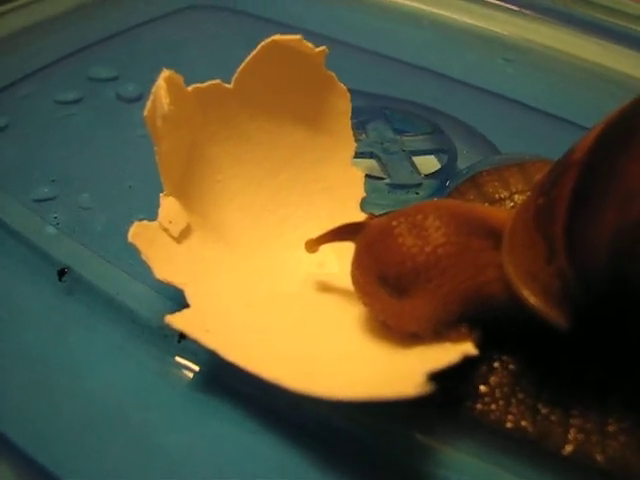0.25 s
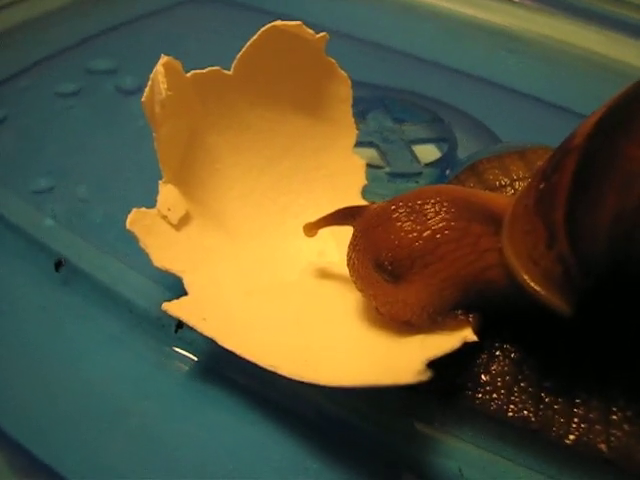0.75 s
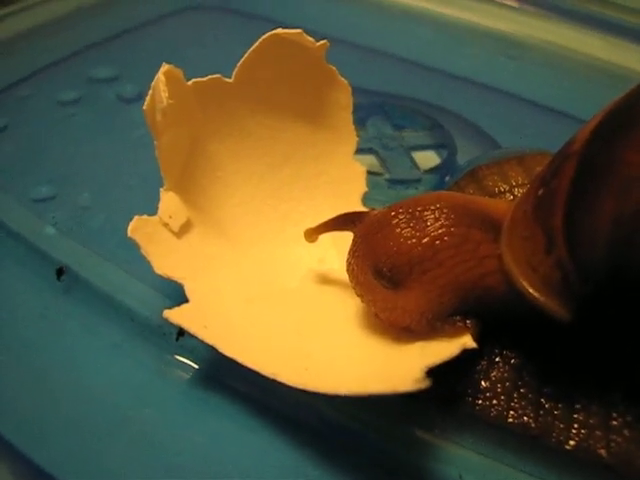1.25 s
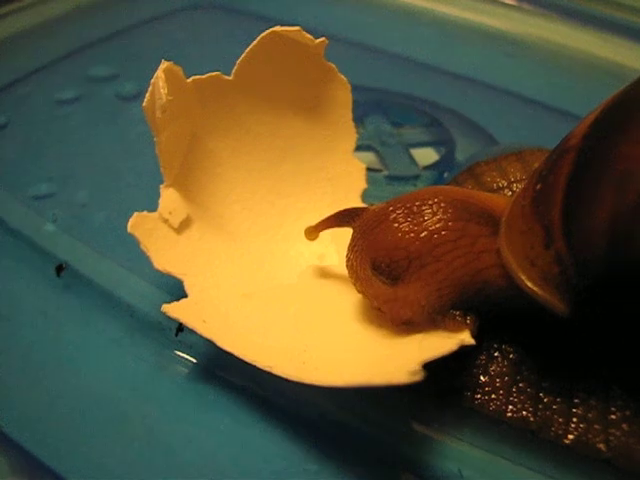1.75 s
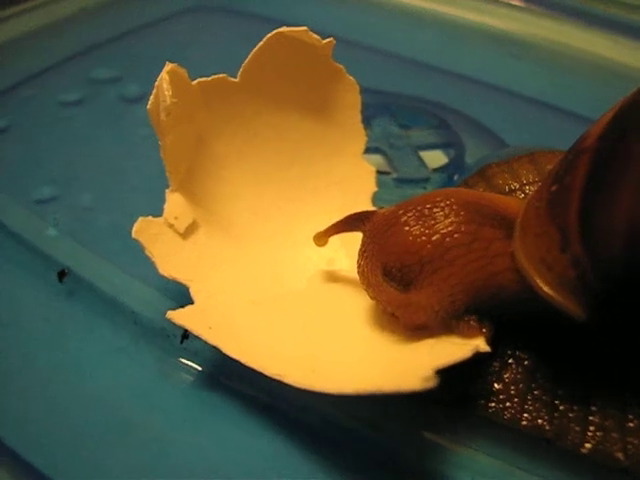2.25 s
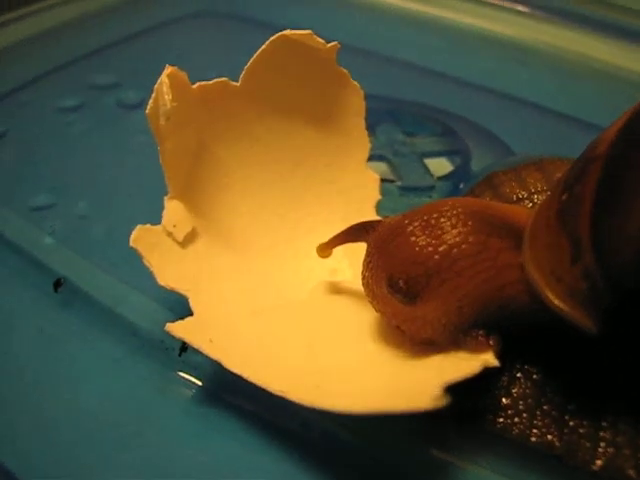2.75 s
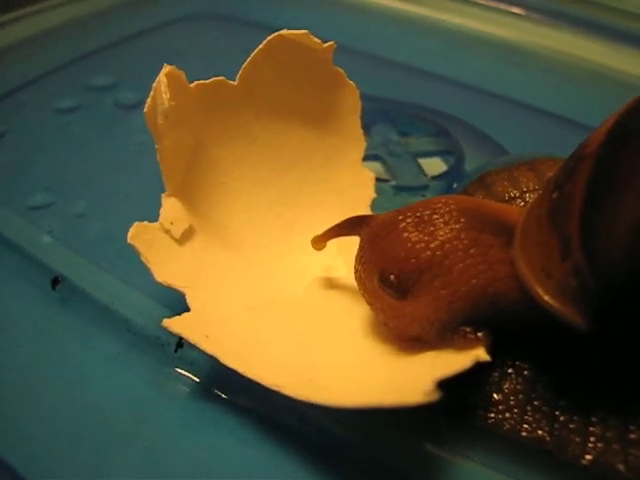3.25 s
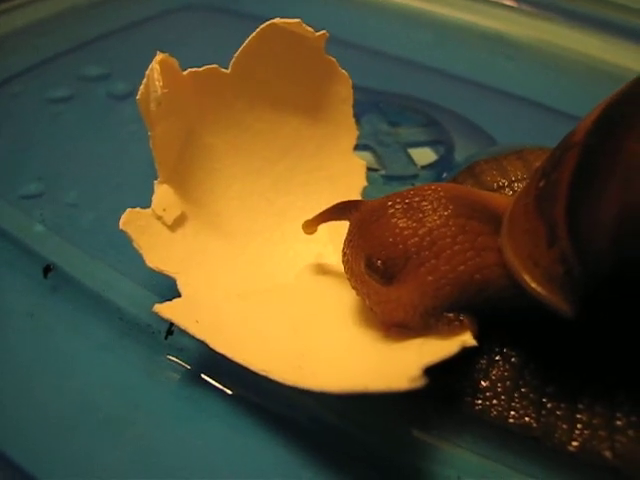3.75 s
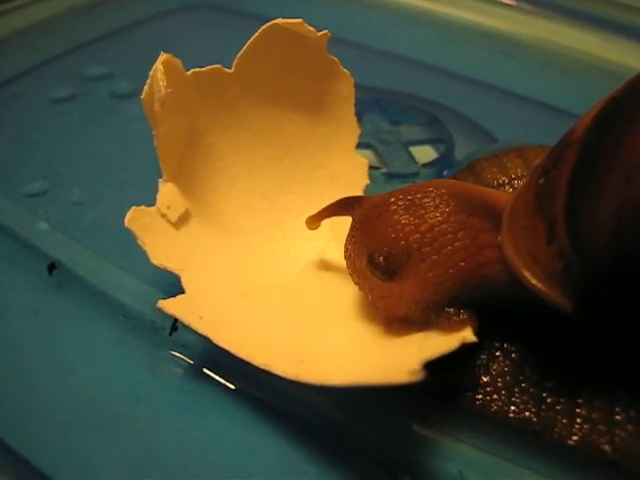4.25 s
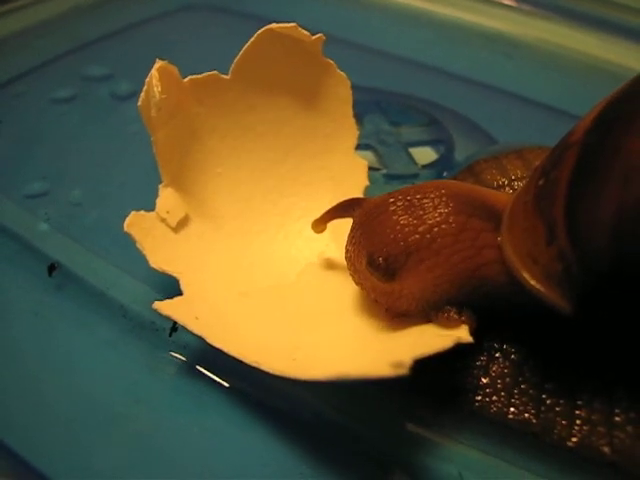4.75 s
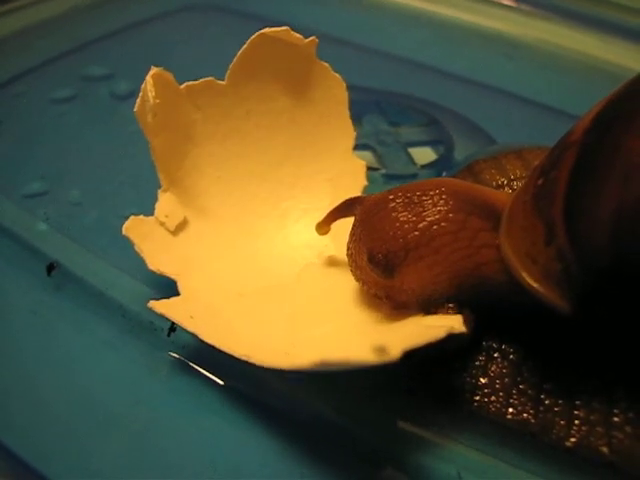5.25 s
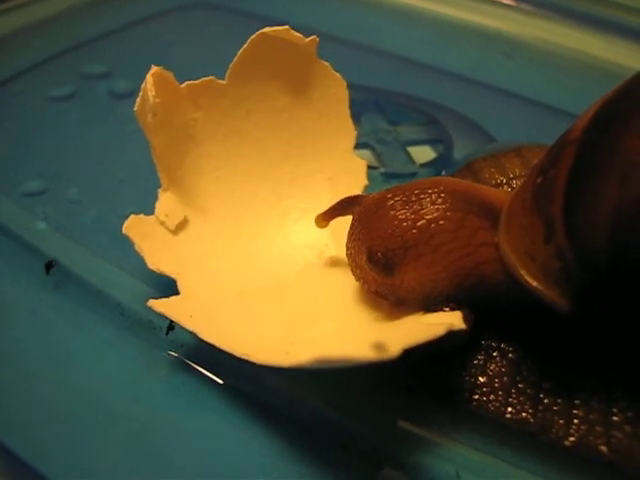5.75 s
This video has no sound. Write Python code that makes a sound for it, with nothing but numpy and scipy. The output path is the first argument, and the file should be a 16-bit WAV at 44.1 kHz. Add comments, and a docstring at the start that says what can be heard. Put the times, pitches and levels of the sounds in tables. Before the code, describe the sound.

A snail rasps at eggshell in a tub, brittle snaps and gritty crackles in uneven clusters over low hum, hiss and a faint high whine.

```python
"""A low room hum, an even hiss and a thin electronic whine from a small, very near camera run throughout.
A large snail rasps at eggshell in a plastic tub: rows of tiny teeth make a fine gritty scrape.
Clusters of snapping chips and smaller crumbs ring the shell's resonances; the tub and room echo them.
The camera's housing ticks and creaks in the hand, and moving fingers add soft, low bumps.
Its gain control turns the sound down after the loudest snaps, then slowly lets it recover."""
import sys
import numpy as np
from scipy import signal
from scipy.fft import rfft, irfft
from scipy.io import wavfile
from scipy.ndimage import uniform_filter1d

SR = 44100
rng = np.random.default_rng(int(sys.argv[2]) if len(sys.argv) > 2 else 0)


def dump_mix(stems):
    """Bounce the given channels to the path in sys.argv[1] as a 16-bit WAV at rate SR."""
    frames = np.atleast_2d(stems).T  # one column per channel
    limited = np.clip(frames, -1, 1)  # hard clip at full scale
    pcm = np.round(limited * 32767).astype(np.int16)
    wavfile.write(sys.argv[1], SR, pcm)


N = 264600

# spectrum of the room and microphone background: f/Hz, relative level per Hz/dB
BACKGROUND_SPECTRUM = [(25, -10.5), (55, -9), (75, -7.5), (92, 3.5), (130, -5), (300, -1), (520, -7),
                       (800, -4.5), (1300, -7.5), (3000, -8.5), (7000, -12), (8500, -10.5), (11000, -17),
                       (15500, -20)]
# hollow hum of the microphone ports: f/Hz, width/Hz, relative level left/dB, right/dB
PORT_HUM = [(401.5, 41, 10, 2.5), (598, 86, -0.5, -5), (975, 83, -4, -2)]
# slow changes of the low background: t/s, relative level/dB
HUM_SWELL = [(0, 4), (1.4, 3), (2, .5), (3.5, 1.1), (4.5, -1), (6, 0.5)]
# how alike the two background channels are: f/Hz, correlation/1
CHANNEL_LIKENESS = [(30, 1), (120, 0.56), (400, 0.6), (1000, 0.43), (3000, 0.18), (15000, 0.048)]
# electronic whine, before its flips: f/Hz of each tone
WHINE_PITCHES = (7867, 8264)
# strength of each whine tone: level left/dB, right/dB
WHINE_LEVELS = [(-51, -49), (-78, -55.5)]
# strokes of the toothed tongue: start t/s, length/s, level at the height/dB
TONGUE_STROKES = [(0.843, 0.4, -60.5), (1.149, .25, -50), (1.357, 0.26, -52), (1.619, 0.62, -63.5),
                  (3.8, 0.23, -56.5), (4.021, .16, -46), (4.188, 0.19, -53.5), (4.561, 0.28, -52),
                  (5.34, .07, -56.5)]
# usual resonances of the eggshell: f/Hz, width/Hz, relative level left/dB, right/dB
SHELL_MODES = [(2050, 304, -16, -19), (2790, 220, -17, -9), (3353, 365, -15.5, -9.5),
               (3820, 320, -12.5, -12.5), (4850, 315, -8, -4.5), (5260, 600, -6, -6), (6210, 584, 3, 6),
               (7290, 510, 1, -0.5), (8600, 1060, -18, -15.5), (9970, 1530, -21, -19),
               (13410, 1400, -28, -35)]
# how the snail's hold bends and damps the shell: t/s, usual bending f/Hz,
# relative bending level/dB, gain of the middle modes/dB
SNAIL_HOLD = [(1.45, 1660, -17, -4.5), (3.9, 1772, -12.5, 5), (4.4, 2030, -26, -1), (4.85, 2140, -38, -3),
              (5.1, 1715, -19, -2), (5.5, 1670, -18.5, -5.5)]
# chips that snap off: t/s, level/dB, relative weight of the low modes/dB, crumbling time/ms
SHELL_SNAPS = [(.0535, -39, -7, .4), (.1505, -39, 2, 4), (0.1635, -28.5, 6, 3.4), (1.1733, -34, -6, .2),
               (1.185, -20.5, -11, 0.14), (1.2293, -28.5, -19, 2.9), (1.2553, -34, -7, 7),
               (1.263, -24, -13, 0.4), (1.2948, -20.5, -11.5, 2), (1.3404, -17, -9, 1.31),
               (1.375, -28, -5, 1), (1.3983, -25.5, 3, 2.9), (1.4207, -26.5, -2, 0.76),
               (1.4269, -21.5, -12, 0.15), (1.4588, -22, -5, 1.57), (1.4654, -25, -6, 0.52),
               (1.4958, -24, -7, 1.2), (1.534, -27.5, -1.5, 2.8), (1.5603, -12, -5, 2.63),
               (1.563, -12.5, -3.5, 1.2), (1.5787, -19, -13, 0.73), (2.054, -28, -17, 0.62),
               (2.062, -28, -7, 1.9), (3.847, -34.5, -15, .3), (3.8766, -37, -7, 0.98),
               (3.9334, -32.5, -19, 0.22), (3.949, -29.5, -6, 1.9), (3.9581, -31, -3, 0.54),
               (3.9948, -24.5, -13, 2.45), (4.028, -23.5, -5, 0.84), (4.0559, -26, -9, 6.8),
               (4.0681, -21.5, -7, .2), (4.075, -16.5, -12, 0.25), (4.0826, -25, -14, 1.8),
               (4.1394, -27.5, -21, 2.9), (4.1549, -8.5, -13, 0.23), (4.1734, -25, -24, 0.27),
               (4.1898, -11.5, -14.5, 0.11), (4.2303, -14.5, -7.5, 0.16), (4.258, -10, -14, 0.31),
               (4.2707, -25, -16, 1.1), (4.2873, -17, -18, 0.97), (4.2921, -16.5, -18, 1.1),
               (4.296, -16, -14, .3), (4.3063, -27, -6, .3), (4.3163, -16, -4, 1.7),
               (4.3223, -10, -6.5, 0.72), (4.334, -29, -12, 1.2), (4.382, -11, -2, 0.18),
               (4.3952, -20.5, -4, 4.8), (4.4011, -15.5, -7, 0.17), (4.4447, -24.5, -21, 0.7),
               (4.519, -32, -8, 0.65), (4.5632, -26.5, -11, 0.95), (4.616, -18, -16, .2),
               (4.6452, -5.5, -11.5, 0.62), (4.701, -16, -5.5, 0.25), (4.708, -3.5, -12, 0.62),
               (4.76, -10.5, -1, 1.47), (4.7737, -2.5, -12, 0.28), (4.7854, -10.5, 0, .8),
               (4.81, -1, -13.5, 0.15), (4.87, -11, -9, 1.04), (5.017, -33.5, -17, 0.57),
               (5.1064, -3, -18.5, 0.21), (5.1105, -8, -7, 0.14), (5.221, -31.5, -1, 0.33),
               (5.4568, -4, -10, 0.52), (5.4818, -8, -13.5, 0.46), (5.5172, -2, -6, 3.02)]
# ring centre aimed at by a 0 dB chip, as the mouth works along the edge: t/s, f/Hz
FULL_CHIP_CENTRE = [(1.3, 6140), (4.28, 6380), (4.39, 6060), (5.5, 6110)]
# hollow notes of the plastic tub: f/Hz, width/Hz, relative level/dB
TUB_NOTES = [(255.6, 23, 7), (430, 52, -1), (804, 44, 6.5), (1407, 44, -6.5)]
# ticks of the housing in the hand: t/s, relative level/dB
HOUSING_TICKS = [(.166, -44.5), (.289, -42), (.78, -40), (.974, -37), (1.342, -42.5), (1.566, -40.5),
                 (1.6195, -37.5), (1.642, -34.5), (1.688, -29.5), (1.7287, -25.5), (2.646, -44),
                 (3.2057, -39), (3.2226, -42), (3.2524, -39), (3.3645, -34), (3.682, -29), (3.6965, -29),
                 (3.7247, -27)]
# resonances of the housing: f/Hz, width/Hz, relative level at the left port/dB, right port/dB
HOUSING_MODES = [(145, 96, -27, -9), (377.5, 35, -1, -8), (604, 54, -2.5, -2.5), (987, 88, -8.5, 0.5),
                 (1048, 61, -25, 3), (1370, 200, -22.5, -11), (3240, 890, -43, -12), (6100, 1900, -45, -20)]
# creaks of the housing: start t/s, length/s, relative level of a slip/dB
HOUSING_CREAKS = [(0.739, .15, -50), (1.585, .1, -41), (3.145, .05, -45.5)]
# soft bumps of the hand: t/s, level/dB, centre f/Hz
HAND_BUMPS = [(1.998, -46, 130), (2.219, -56, 190), (2.289, -49, 250), (2.85, -48.5, 211),
              (2.908, -48, 173), (3.379, -50.5, 130)]

TAPS = 2048  # length of a short response, in samples
BINS = np.fft.rfftfreq(TAPS, 1 / SR)  # Hz
TIME = np.arange(N) / SR  # s
FRAME_HZ = 29.97  # picture frames per second
EDGE_HZ = 16100  # upper band limit

STROKE_PEAK, STROKE_SHAPE = 0.32, 0.99  # share spent pressing harder; lower shape = flatter top
IDLE_DB = -74.5  # the mouth never quite rests
MIDDLE_HZ, MIDDLE_WIDTH_HZ = 5300, 260  # shell modes changed by the snail's hold
# weaker chips aim for a higher ring, and no two are quite alike
RISE_HZ_PER_DB, CHIP_SPREAD_HZ = 11.5, 50
# first give before a chip goes: average lead, level below the snap, highest level
GIVE_MS, GIVE_UNDER_DB, GIVE_TOP_DB = 1.8, -15.5, -29.5
HARD_TICK_DB, HARD_CRISP_DB, CRISP_PER_DB = -26, -2.5, 0.8  # harder ticks have crisper treble
SLIP_GAP_S, SLIP_JITTER = .02, 0.263  # jitter is a share of the gap
# crumbs: rate, level above the stroke's pressure and its spread
CRUMBS_PER_S, CRUMB_OVER_DB, CRUMB_SPREAD_DB = 33, 17.5, 2
# weight of their low modes and its spread; average crumbling time
CRUMB_LOW_DB, CRUMB_LOW_SPREAD_DB, CRUMB_MS = -6, 5.5, 1.2


def amp(db):
    """Turns decibels into gain."""
    return 10 ** (np.asarray(db) / 20)


def evened(x):
    """Scales a sound to an rms level of one."""
    return x / np.sqrt(np.mean(x ** 2) + 1e-20)


def read(points, hz):
    """Reads a spectrum between its points, along a log-frequency axis."""
    f, value = np.transpose(points)
    return np.interp(np.log(hz + 1), np.log(f + 1), value)


def add(mix, s, sound):
    """Mixes a sound in at time s, cutting off anything past the end."""
    part = mix[:, max(round(s * SR), 0):][:, :sound.shape[1]]
    part += sound[:, :part.shape[1]]


def sides(modes):
    """Splits two-sided resonances into a left set and a right set."""
    modes = np.array(modes)
    return modes[:, [0, 1, 2]], modes[:, [0, 1, 3]]


def peaks(modes, hz, steep):
    """Gives the gain of resonances with summed power; steep sets how fast their skirts fall."""
    power = 0
    for f, width, db in modes:
        distance = (2 * (hz - f) / width) ** 2
        power = power + amp(db) ** 2 / (1 + distance / steep) ** steep
    return np.sqrt(power)


def causal(gain):
    """Gives a gain curve the phase of a sound that starts sharply and then rings out."""
    log_gain = np.log(np.maximum(gain, 1e-5))
    mirrored = np.r_[log_gain, log_gain[-2:0:-1]]
    return np.exp(np.conj(signal.hilbert(mirrored)))[:len(gain)]


def per_ms(x):
    """Scales a click to the energy of one millisecond at full level."""
    energy = (x ** 2).sum(-1).mean()
    return x / np.sqrt(energy * 1000 / SR)


def background(level_db=-48.0):
    """Shapes noise into a slowly changing low hum, coloured by the microphone ports, and an even hiss."""
    hz = np.fft.rfftfreq(N, 1 / SR)
    left, other = rfft(rng.standard_normal((2, N)))
    same = read(CHANNEL_LIKENESS, hz)
    right = same * left + np.sqrt(1 - same ** 2) * other
    ports = np.array([peaks(side, hz, steep=1.9) for side in sides(PORT_HUM)])
    colour = np.hypot(amp(read(BACKGROUND_SPECTRUM, hz)), ports) * (hz < 15900)
    noise = np.array([left, right]) * colour
    low = 1 / (1 + (hz / 1500) ** 2)
    hum = irfft(noise * low, N) * amp(np.interp(TIME, *np.transpose(HUM_SWELL)))
    hiss = irfft(noise * (1 - low), N)
    return amp(level_db) * evened(hum + hiss)


def whine(right_late=0.7):
    """Flips thin electronic tones over with every picture frame, which makes them flutter."""
    flip = (-1) ** np.floor(TIME * FRAME_HZ)
    lag = np.array([[0], [right_late]])  # radians
    tones = np.zeros((2, N))
    for hz, db in zip(WHINE_PITCHES, WHINE_LEVELS):
        tones += amp(db)[:, None] * np.sqrt(2) * np.sin(2 * np.pi * hz * TIME - lag)
    return flip * tones


def pressure():
    """Makes the force of the scrape swell and let go in the same arch for every stroke."""
    gain = np.full(N, amp(IDLE_DB))
    for start, length, db in TONGUE_STROKES:
        rise = np.interp((TIME - start) / length, [0, STROKE_PEAK, 1], [0, 1, 0])
        gain = np.maximum(gain, amp(db) * np.sin(np.pi / 2 * rise) ** STROKE_SHAPE)
    return gain


def shell_ring(centre_hz, low_db, crumble_ms, s, usual_hz=6350, usual_low_db=-13, lean_db=9,
               thud_db=-36, bend_width_hz=480, bounce=0.37, bounce_ms=0.842, follow=0.74,
               right_late_ms=0.013):
    """Rings the shell as held at time s with a crack, its followers and an echo from the tub floor."""
    lean = (centre_hz - usual_hz) / usual_hz
    times, *columns = np.transpose(SNAIL_HOLD)
    bend_hz, bend_db, middle_db = (np.interp(s, times, column) for column in columns)
    bend = (bend_hz, bend_width_hz, bend_db, bend_db)
    modes = np.array([bend] + list(SHELL_MODES), float)
    # the modes follow only part of the shift in centre, and each varies a little
    modes[:, 0] *= 1 + .35 * lean + .016 * rng.standard_normal(len(modes))
    modes[:, 2:] += 1.6 * rng.standard_normal((len(modes), 2))

    # small chips favour the high modes, deep cracks the low ones
    colour_db = lean_db * lean * 10 * np.clip(np.log2((BINS + 1) / usual_hz), -.4, .4)
    low_lift_db = (low_db - usual_low_db + 30 * lean) * 0.85
    colour_db = colour_db + low_lift_db / (1 + (BINS / 4200) ** 10)
    colour_db = colour_db + middle_db * np.exp(-((BINS - MIDDLE_HZ) / MIDDLE_WIDTH_HZ) ** 2)
    thud = amp(thud_db) * (BINS / (BINS + 400)) ** 2
    gains = [(peaks(side, BINS, steep=2.27) + thud) * amp(colour_db) for side in sides(modes)]
    ring = np.array([causal(gain) for gain in gains])

    turn = -2j * np.pi * BINS / 1000  # phase turn per ms of delay
    # the crack runs on in a few uneven steps
    order = np.arange(1, 5)
    delays = crumble_ms * (order - rng.uniform(0, 0.62, len(order))) / len(order)
    signs = rng.choice([-1, 1], len(order))
    sizes = follow * np.tanh(crumble_ms ** 2) * signs / order ** 0.16
    crack = 1 + sizes @ np.exp(np.outer(delays, turn))
    echo_ms = bounce_ms * (rng.uniform(0.806, 1.163) + rng.uniform(0, 0.059, (2, 1)))
    floor_echo = 1 + bounce * np.exp(turn * echo_ms)
    arrival = np.exp(turn * [[0], [right_late_ms]])
    return per_ms(irfft(ring * crack * floor_echo * arrival))


def grit(per_s=650, spread_db=4, low_db=-10, fizz=1.4, count=10):
    """Catches tiny teeth on the shell at random, each a faint ring with a dry fizz on top."""
    out = np.zeros((2, N))
    for _ in range(count):
        hits = rng.random(N) < per_s / count / SR
        catches = hits * amp(spread_db * np.minimum(rng.exponential(1, N), 3))
        # each group rings as the shell is held at some random moment
        ring = shell_ring(rng.uniform(5600, 7300), low_db, 0, rng.choice(TIME))
        out += signal.oaconvolve(catches[None], ring, axes=1)[:, :N]
    fizz_band = signal.butter(3, [8200, 11500], "band", fs=SR, output="sos")
    out += fizz * signal.sosfilt(fizz_band, out)
    return evened(out) * pressure()


def chip(s, db, low_db, crumble_ms):
    """Breaks one piece off; the louder it is, the lower the shell tends to ring."""
    full_hz = np.interp(s, *np.transpose(FULL_CHIP_CENTRE))
    centre_hz = full_hz - RISE_HZ_PER_DB * db + CHIP_SPREAD_HZ * rng.standard_normal()
    return amp(db) * shell_ring(centre_hz, low_db, crumble_ms, s)


def snaps():
    """Breaks chips off the edge of the shell, each after a slight first give."""
    out = np.zeros((2, N))
    for s, db, low_db, crumble_ms in SHELL_SNAPS:
        add(out, s, chip(s, db, low_db, crumble_ms))
        early_s = GIVE_MS * rng.uniform(.5, 1.5) / 1000
        give_db = min(db + GIVE_UNDER_DB, GIVE_TOP_DB)
        add(out, s - early_s, chip(s, give_db, low_db, GIVE_MS))
    return out


def tub(x, scatter_db=-20.5, scatter_t60=.014, hollow_db=6):
    """Scatters each click off the tub walls for a few milliseconds while its hollow notes ring on."""
    t = np.arange(TAPS) / SR
    scatter = rng.standard_normal((2, TAPS)) * amp(-60 * t / scatter_t60) * (t > .0012)
    scatter = amp(scatter_db) * scatter / np.linalg.norm(scatter[0])
    hollow = amp(hollow_db) * irfft(causal(peaks(TUB_NOTES, BINS, steep=1.34)))
    return signal.oaconvolve(x, scatter + hollow, axes=1)[:, :N]


def room_tail(t60=0.26, treble_t60=.1, wall_s=0.013, wall_db=5, treble=.3):
    """Scatters fading echoes of a small room, strengthened when the nearest walls answer."""
    t = np.arange(SR // 2) / SR
    taps = rng.standard_normal((2, len(t))) * (rng.random((2, len(t))) < .3)
    taps = (taps + 0.17 * taps[::-1]) * (t > .002)
    taps = taps * amp(wall_db * np.exp(-((t - wall_s) / 0.002) ** 2))
    low = signal.sosfilt(signal.butter(3, 8100, fs=SR, output="sos"), taps)
    high = signal.sosfilt(signal.butter(3, 8100, "high", fs=SR, output="sos"), taps)
    tail = low * amp(-60 * t / t60) + treble * high * amp(-60 * t / treble_t60)
    return tail / np.linalg.norm(tail[0])


def room(x, wet_db=-16.0, beam_hz=6200, beam_width_hz=900, beam_db=3):
    """Echoes the sound with its main note softened, as the shell beams that note at the microphone."""
    hz = np.fft.rfftfreq(N, 1 / SR)
    softening_db = -beam_db * np.exp(-((hz - beam_hz) / beam_width_hz) ** 2)
    spread = irfft(rfft(x) * amp(softening_db), N)
    return amp(wet_db) * signal.fftconvolve(spread, room_tail(), axes=1)[:, :N]


def slips():
    """Lists the times and levels of the weak stick-slip ticks that make up each creak."""
    rows = []
    for start, length, db in HOUSING_CREAKS:
        for s in np.arange(start, start + length, SLIP_GAP_S):
            jitter_s = SLIP_GAP_S * SLIP_JITTER * rng.uniform(-0.983, 1)
            rows.append((s + jitter_s, db + 2 * rng.standard_normal()))
    return rows


def housing_ticks(level_db=7.5):
    """Rings the plastic housing with dull ticks and creaks, mostly stronger at the right port."""
    out = np.zeros((2, N))
    for s, db in list(HOUSING_TICKS) + slips():
        crisp_db = HARD_CRISP_DB + CRISP_PER_DB * (db - HARD_TICK_DB)
        modes = np.array(HOUSING_MODES, float)
        modes[:, 2:] += 1.7 * rng.standard_normal((len(modes), 1))
        tilt = amp(crisp_db * (3 - 1 / (1 + (BINS / 1600) ** 4)))
        colour = tilt * BINS / (BINS + 60)
        gains = [colour * peaks(side, BINS, steep=1.26) for side in sides(modes)]
        ring = np.array([irfft(causal(gain)) for gain in gains])
        add(out, s, amp(db + level_db) * per_ms(ring))
    return out


def crumbs():
    """Breaks small flakes off at uneven moments of each stroke, louder where the teeth press harder."""
    out = np.zeros((2, N))
    press_db = 20 * np.log10(pressure())
    for start, length, _ in TONGUE_STROKES:
        for slot in np.arange(start, start + length, 1 / CRUMBS_PER_S):
            s = slot + rng.random() / CRUMBS_PER_S
            size, depth = rng.standard_normal(2)
            db = np.interp(s, TIME, press_db) + CRUMB_OVER_DB + CRUMB_SPREAD_DB * size
            low_db = CRUMB_LOW_DB + CRUMB_LOW_SPREAD_DB * depth
            add(out, s, chip(s, db, low_db, CRUMB_MS * rng.exponential()))
    return out


def hand_bumps(rise_s=0.01, width=0.97):
    """Shapes noise into short, low puffs as fingers shift on the camera."""
    out = np.zeros((2, N))
    t = np.arange(SR // 6) / SR
    bins = np.fft.rfftfreq(len(t), 1 / SR)
    swell = t / rise_s * np.exp(1 - t / rise_s)
    for s, db, hz in HAND_BUMPS:
        colour = peaks([(hz, width * hz, 0)], bins, steep=1)
        rumble = evened(irfft(rfft(rng.standard_normal(len(t))) * colour, len(t)))
        add(out, s, (amp(db) * rumble * swell)[None])
    return out


def scene():
    """Mixes the snail chewing in its tub with the background and the camera's small noises."""
    camera = background() + whine() + hand_bumps()
    chewing = snaps() + grit() + crumbs()
    return chewing + tub(chewing) + room(chewing) + housing_ticks() + camera


def record(dry, threshold_db=-13, squeeze=0.57, recover_db=28):
    """Turns loud sound down just too late for each snap, flattens peaks, then limits the treble."""
    power = uniform_filter1d((dry ** 2).mean(0), size=44)
    power_db = 10 * np.log10(abs(power) + 1e-12)
    wanted_db = np.maximum(squeeze * (power_db - threshold_db), 0)
    # hold each reduction, letting it recover by recover_db each second
    fall = TIME * recover_db
    duck_db = np.maximum.accumulate(wanted_db + fall) - fall
    delay = np.hanning(176)  # smooths and delays the control by about 2 ms
    late_db = signal.lfilter(delay / delay.sum(), 1, duck_db)
    # double the sample rate while flattening peaks
    fine = signal.resample_poly(dry * amp(-late_db), 2, 1, axis=1)
    flattened = signal.resample_poly(np.clip(fine, -1, 1), 1, 2, axis=1)
    band_limit = signal.firwin(255, EDGE_HZ, window=("kaiser", 8), fs=SR)
    return signal.oaconvolve(flattened, band_limit[None], "same")


dry = scene()
out = record(dry)
dump_mix(out)
```